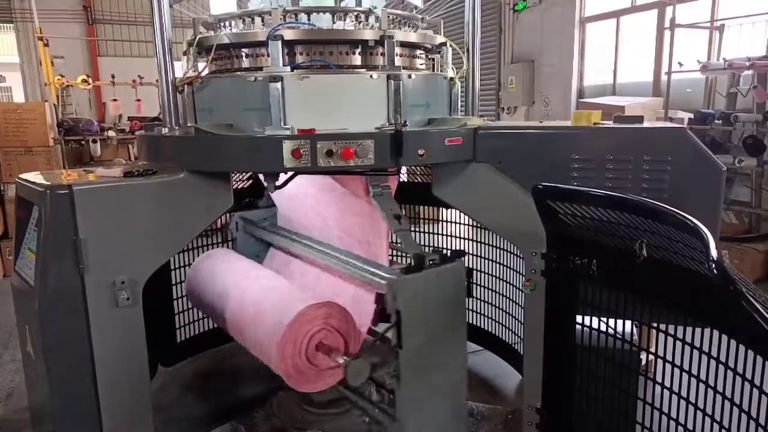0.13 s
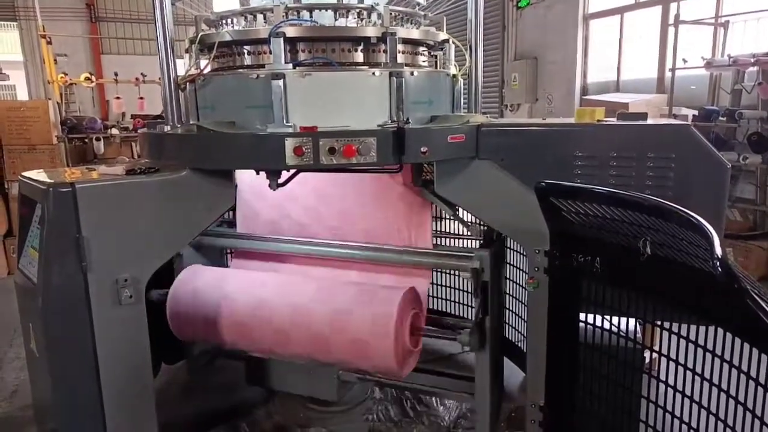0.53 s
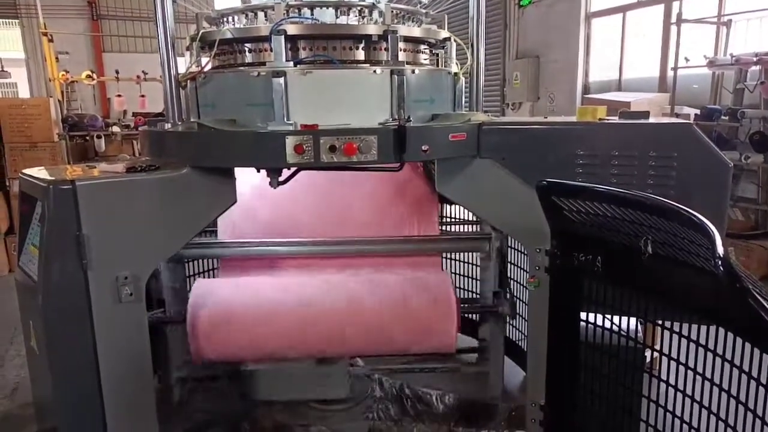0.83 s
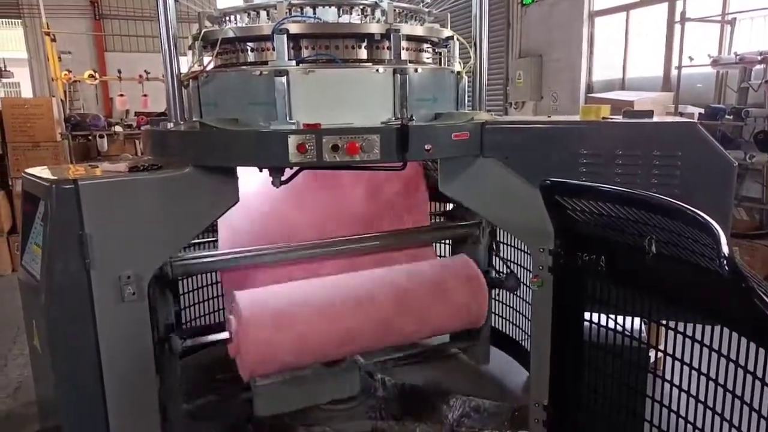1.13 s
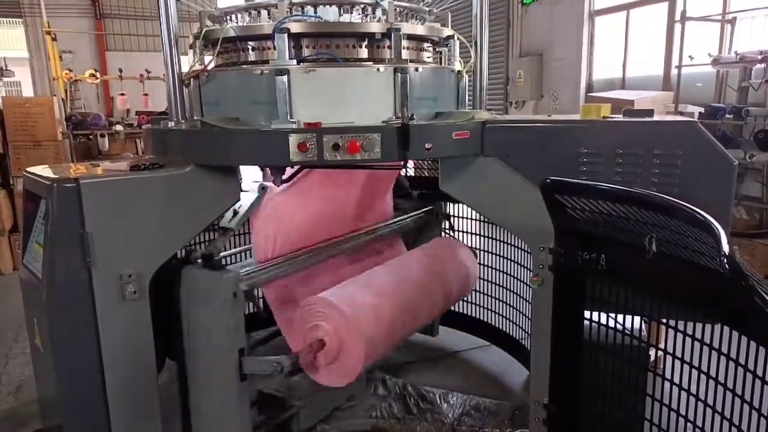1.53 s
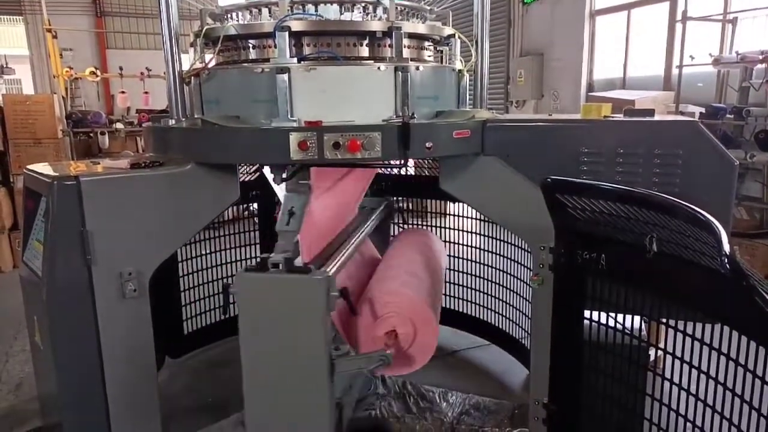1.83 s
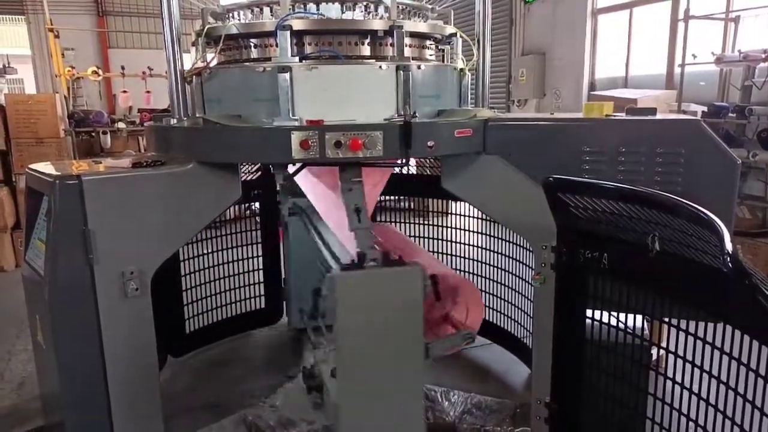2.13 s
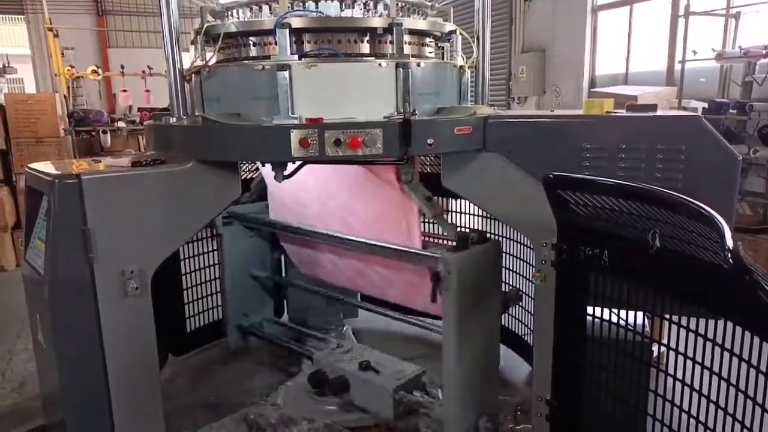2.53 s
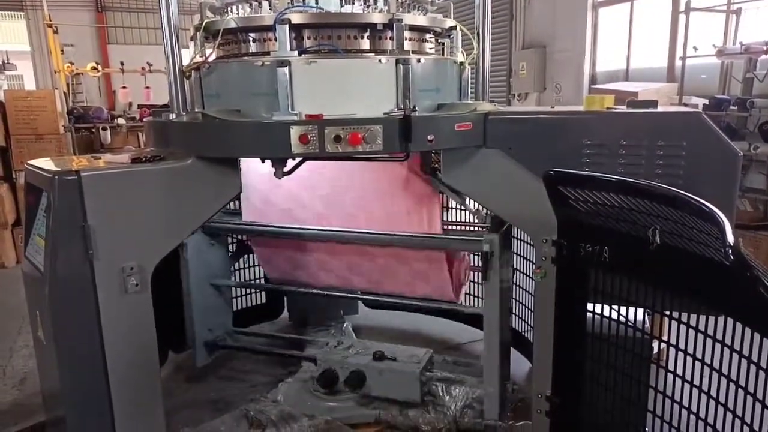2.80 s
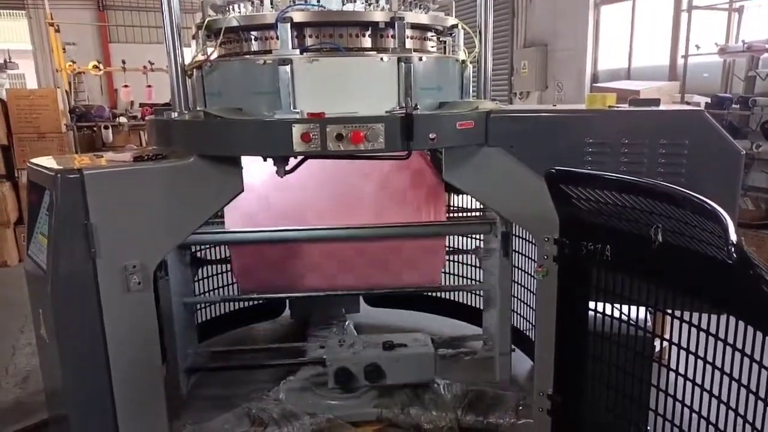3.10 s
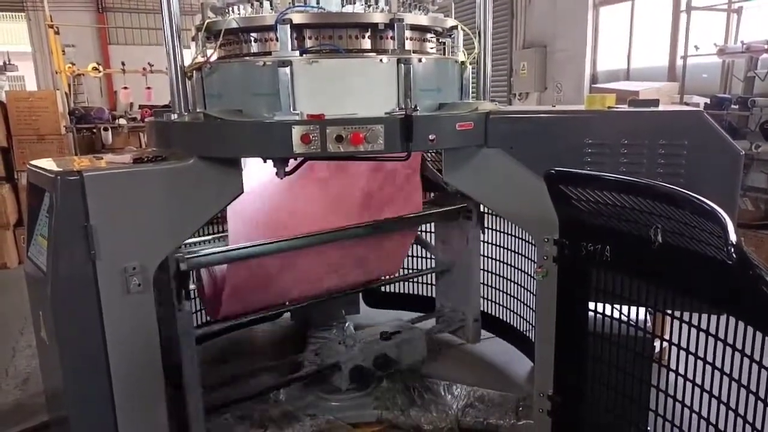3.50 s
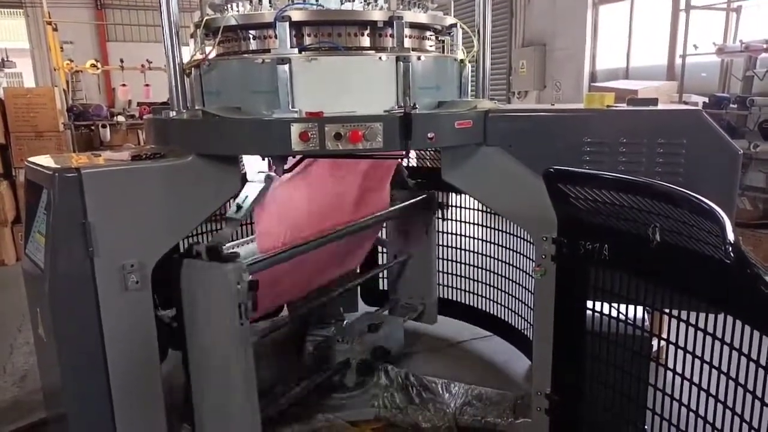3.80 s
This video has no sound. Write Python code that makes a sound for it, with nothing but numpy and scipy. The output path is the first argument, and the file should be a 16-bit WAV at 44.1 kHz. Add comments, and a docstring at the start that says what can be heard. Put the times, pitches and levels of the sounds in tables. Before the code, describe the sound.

A large knitting machine whirrs steadily in a factory hall, heard from just in front. Its needles blur into a dense rattle over a throbbing motor hum, while a whine repeatedly sags and jumps in pitch and soft low booms recur.

```python
"""A circular knitting machine runs steadily in a factory hall. From the start, hundreds of needles
rattle through their cams and blur into a whirr, over the throbbing hum of motor and gears and under
a thin hiss. Throughout, a turning part sings near 1 kHz, its overtones swelling in turn. At 0.5 s comes
a low boom; soon after, the sagging pitch of the whine jumps up, as it does four more times. From 1.8 s
the booms come more often, and near 3.6 s the last jump breaks into a rasp as a drone swells briefly."""
import sys
import numpy as np
from scipy import signal
from scipy.fft import rfft, irfft
from scipy.io import wavfile

SR = 44100
rng = np.random.default_rng(int(sys.argv[2]) if len(sys.argv) > 2 else 0)


def pcm_store(signal):
    """Save signal as 16-bit PCM."""
    levels = np.round(np.clip(np.atleast_2d(signal), -1, 1) * 32767)
    wavfile.write(sys.argv[1], SR, levels.astype(np.int16).T)


N = 174195
TIME = np.arange(N) / SR


def from_db(db):
    """Amplitude ratio: a factor of ten for every 20 dB."""
    return 10 ** (np.asarray(db) / 20)


def unit_rms(x):
    """Normalisation to a mean power of one."""
    return x / np.sqrt(np.mean(x ** 2) + 1e-20)


def in_time(rows):
    """Linear interpolation of (time_s, value) rows at every sample."""
    return np.interp(TIME, *np.transpose(rows))


def gaussian(centre_s, half_s):
    """A Gaussian envelope of height 1, down to 1/e at half_s from its centre."""
    return np.exp(-((TIME - centre_s) / half_s) ** 2)


def drift(rate_hz):
    """Random fluctuation of unit power: noise through a two-pole low-pass at rate_hz."""
    step, settle = 40, 2000   # samples per slow step; steps for the filter to settle
    pole = np.exp(-2 * np.pi * rate_hz * step / SR)
    noise = rng.standard_normal(N // step + settle + 2)
    slow = signal.lfilter([1], [1, -2 * pole, pole * pole], noise)[settle:]
    return np.interp(np.arange(N) / step, np.arange(len(slow)), unit_rms(slow))


def scatter(rate_hz):
    """A random phasor of unit power: amplitude and phase both fluctuate."""
    return (drift(rate_hz) + 1j * drift(rate_hz)) / np.sqrt(2)


def wavering_tone(pitch_hz, waver, rate_hz, clock=TIME):
    """Narrow-band modulation: a steady phasor plus a random one, at unit power."""
    phasor = 1 + waver * np.sqrt(2) * scatter(rate_hz)
    carrier = np.exp(2j * np.pi * (pitch_hz * clock + rng.random()))
    return unit_rms(np.real(phasor * carrier))


def coloured(white, spectrum):
    """Source and filter: white excitation takes on a spectral density, silent above its last row."""
    hz, db = np.transpose(spectrum)
    bins_hz = np.maximum(np.arange(N // 2 + 1) * SR / N, 1)
    gain = from_db(np.interp(np.log(bins_hz), np.log(hz), db, right=-np.inf))
    return irfft(rfft(white) * gain, N) * np.sqrt(SR / 2)


# Spectrum of the needle whirr, broad, strongest in the low mids, with little above 8.5 kHz:
# frequency_hz, relative_density_db
WHIRR_SPECTRUM = [(25, -86), (50, -80), (70, -73.5), (100, -68.5), (140, -59), (200, -58), (280, -57),
                  (400, -59), (560, -58), (750, -58.5), (860, -62.5), (1000, -64), (1150, -65.5),
                  (1400, -67), (1700, -66.5), (2250, -64.5), (2800, -63.5), (3400, -65.5), (4100, -62),
                  (4600, -64), (4900, -70.5), (5300, -73), (6000, -69), (6600, -69), (7500, -72),
                  (7900, -76), (8450, -75.5), (8800, -102), (10300, -92.5), (11000, -112)]

def needle_whirr(ticks_per_s=2500, tick_spread_db=2, tick_power_share=0.31):
    """Shot noise: dense needle impacts merge with sliding friction into a broad whirr."""
    strengths = from_db(tick_spread_db * np.minimum(rng.exponential(1, N), 4))
    signs = rng.choice([-1, 1], N)
    struck = rng.random(N) < ticks_per_s / SR
    ticks = unit_rms(strengths * signs * struck)
    sliding = rng.standard_normal(N)
    contact = np.sqrt(tick_power_share) * ticks + np.sqrt(1 - tick_power_share) * sliding
    level_db = -1 + 0.5 * drift(rate_hz=16)
    return from_db(level_db) * coloured(contact, WHIRR_SPECTRUM)


# Envelope of each harmonic of the whine, keyed by its number: time_s, relative_level_db
HARMONIC_LEVELS = { 1: [(0, -38.5), (.34, -36), (.44, -35.5), (.64, -24.5), (.73, -45), (.94, -32),
                   (1.16, -55), (1.42, -33.5), (1.53, -37.5), (1.74, -39.5), (1.82, -24.5), (1.9, -32),
                   (1.955, -26.5), (2.0, -38), (2.28, -46.5), (2.49, -29), (2.59, -38.5), (2.71, -34),
                   (2.78, -46), (3.38, -34.5), (3.52, -39.5), (3.94, -32.5)], 2: [(0, -50), (.06, -25.5),
                   (.11, -36.5), (.6, -38), (.8, -30), (1.11, -26.5), (1.2, -29), (1.5, -26.5), (1.88, -41),
                   (2.01, -27.5), (2.15, -28.5), (2.35, -24), (2.44, -29.5), (2.55, -32.5), (2.69, -31),
                   (2.8, -32.5), (2.93, -42), (3.18, -34.5), (3.4, -42), (3.54, -35), (3.62, -27.5),
                   (3.7, -37), (3.94, -33)], 3: [(0, -33), (.06, -36), (.15, -36), (.31, -32), (.44, -57),
                   (.56, -32.5), (.68, -42), (1, -44), (1.1, -36.5), (1.25, -32.5), (1.35, -37), (1.8, -37),
                   (1.88, -40), (2.2, -34), (2.29, -40), (2.55, -35), (2.65, -43), (2.83, -50), (2.94, -36),
                   (3.03, -38), (3.16, -33), (3.22, -42), (3.7, -41), (3.94, -38)], 4: [(0, -35),
                   (.25, -36.5), (.48, -31.5), (.77, -38.5), (.89, -35), (1.03, -38), (1.21, -43),
                   (1.38, -34), (1.74, -38), (1.86, -25), (1.92, -39), (1.98, -27), (2.04, -30),
                   (2.16, -27), (2.22, -30), (2.27, -19.5), (2.32, -27), (2.36, -23.5), (2.44, -28),
                   (2.5, -26), (2.6, -31), (2.66, -33), (2.78, -36), (3.43, -43), (3.94, -36.5)],
                   6: [(0, -43), (.23, -51), (.6, -45), (.98, -45), (1.4, -49), (1.79, -48), (2.31, -49),
                   (2.68, -37), (2.83, -51), (3.94, -53)], 7: [(0.0, -46), (0.62, -38.5), (0.69, -47),
                   (1.15, -62), (1.24, -37), (1.32, -56), (1.75, -37), (2.3, -48), (2.35, -29.5),
                   (2.48, -44), (2.53, -26), (2.6, -44), (2.99, -41.5), (3.61, -49), (3.72, -44),
                   (3.94, -55)], }
# Noisy share of the fundamental's power, greatest at pitch jumps: time_s, roughness_fraction
ROUGHNESS = [(0, 0.07), (.3, 0.22), (.5, 0), (.66, .15), (.76, 0.33), (.85, 0.37), (.95, 0.06), (1.25, 0),
             (1.33, 0.09), (1.6, 0.11), (1.85, 0.04), (1.97, 0.17), (2.05, 0.46), (2.14, 0.09),
             (2.25, 0.01), (2.55, 0.02), (2.66, 0.02), (2.9, 0.24), (3.15, .08), (3.45, 0.02), (3.56, 0.82),
             (3.64, .65), (3.73, 0), (3.95, 0)]

def whine_harmonics(pitch_hz, rasp_width_hz=20, flutter_db=0.98):
    """A harmonic series: roughness moves power from each line into a noise band, higher ones first."""
    phase = 2 * np.pi * np.cumsum(pitch_hz) / SR
    smoothness = np.clip(1 - in_time(ROUGHNESS), 0, 1)
    out = 0
    for number, levels in HARMONIC_LEVELS.items():
        tonal_share = smoothness ** number
        phasor = np.sqrt(tonal_share) + np.sqrt(1 - tonal_share) * scatter(rasp_width_hz * number)
        gain = from_db(in_time(levels) + flutter_db * drift(rate_hz=22))
        out += np.sqrt(2) * gain * np.real(phasor * np.exp(1j * number * phase))
    return out


def hall(x, t60_s=0.51, delay_s=0.016):
    """Diffuse reverberation: convolution with exponentially decaying noise of unit energy."""
    t = TIME[:SR]
    tail = rng.standard_normal(SR) * 1e-3 ** (t / t60_s) * (t > delay_s)
    return signal.fftconvolve(x, tail / np.sqrt(np.sum(tail ** 2)))[:N]


# Fundamental of the singing part, jumping and sagging: time_s, pitch_hz
WHINE_FUNDAMENTAL = [(0.0, 995), (0.11, 988), (0.31, 937.5), (0.51, 921), (0.645, 908.5), (0.7, 995),
                     (0.76, 1070), (0.88, 1002.0), (1.01, 985), (1.27, 979.5), (1.31, 1017), (1.48, 991),
                     (1.7, 931), (1.84, 912), (1.95, 913), (2.04, 1046), (2.12, 984), (2.2, 966.4),
                     (2.57, 955), (2.63, 1002), (2.69, 1004), (2.9, 928), (2.98, 915), (3.14, 934),
                     (3.3, 909.6), (3.45, 908), (3.54, 1021), (3.63, 953), (3.76, 941), (3.95, 942)]

def whine(held_jitter_hz=1.0, glide_jitter_s=0.00388, smear_hz=2.53):
    """Frequency modulation: a turning part jitters as it glides; the turning frame smears its echoes."""
    pitch_hz = in_time(WHINE_FUNDAMENTAL)
    glide_hz_per_s = np.abs(np.gradient(pitch_hz)) * SR
    jitter_hz = held_jitter_hz + glide_jitter_s * glide_hz_per_s
    pitch_hz += jitter_hz * drift(rate_hz=68.5)
    echoes = hall(whine_harmonics(pitch_hz + smear_hz * drift(rate_hz=16.9)))
    direct = whine_harmonics(pitch_hz)
    return from_db(-1) * direct + from_db(-9) * echoes


# Drive tones that swell and fade:
# pitch_hz, throb_fraction, waver_ratio, waver_rate_hz, envelope rows of (time_s, relative_level_db)
DRIVE_TONES = [ (155.7, 0.07, 0.23, 6.4, [(0, -39), (.2, -45), (.32, -33.5), (1.15, -54), (1.55, -46),
               (1.8, -37.5), (2.5, -43.5), (3.95, -51)]), (203.6, 0.99, 0.12, 3.6, [(0, -41), (.22, -30.5),
               (.43, -36), (.65, -31), (.78, -41.5), (.95, -48), (1.06, -36), (1.27, -30.5), (1.47, -38),
               (1.68, -32), (1.82, -36.5), (1.92, -32), (2.1, -34.5), (2.58, -36.5), (2.7, -41),
               (3.03, -38), (3.15, -33.5), (3.8, -35), (3.95, -37)]), (612, 0.36, 0.32, 15, [(0, -42),
               (.07, -33), (.2, -33), (.42, -41), (.6, -34), (.98, -40), (1.17, -29.5), (1.46, -50),
               (1.55, -37), (1.7, -32), (1.77, -52), (1.95, -51), (2.18, -33), (2.38, -45), (2.55, -36.5),
               (2.97, -46), (3.05, -32.5), (3.18, -31.5), (3.39, -42), (3.6, -36), (3.95, -41.5)]), ]
# Uneven dips in level that the drive tones share: centre_s, depth_fraction
THROB_DIPS = [(.09, 0.9), (.31, 0.63), (.51, 0.6), (.86, 0.5), (1.18, .7), (1.38, 0.5), (1.55, 0.81),
              (1.99, 0.74), (2.26, 0.95), (2.46, .6), (2.83, 0.8), (3.48, 0.96)]

def drive_drones(dip_half_s=0.049, speed_wander=0.0073):
    """Amplitude and frequency modulation: tones of one drive throb together and follow its speed."""
    dips = sum(depth * gaussian(centre_s, dip_half_s) for centre_s, depth in THROB_DIPS)
    clock = np.cumsum(1 + speed_wander * drift(rate_hz=10.3)) / SR
    out = 0
    for pitch_hz, throb, waver, rate_hz, levels in DRIVE_TONES:
        envelope = from_db(in_time(levels)) * np.clip(1 - throb * dips, 0, 1)
        out += envelope * wavering_tone(pitch_hz, waver, rate_hz, clock)
    return out


# Faint steady tones of motor and gears: pitch_hz, level_db
HUM_LINES = [(80.7, -55), (105, -57), (134.6, -55), (293.4, -46), (403, -45), (449.5, -47), (476.4, -54),
             (500.6, -49.5), (553.1, -52), (804.8, -51.5), (1075.3, -49.5), (1098.2, -50), (1441.4, -59),
             (1609.6, -49), (2012, -46.5)]

def motor_and_gears():
    """Periodic forces give a line spectrum: a faint hum, a firm gear tone and a fluttering one."""
    hum = sum(from_db(db) * wavering_tone(hz, waver=0.32, rate_hz=2.3) for hz, db in HUM_LINES)
    firm_gear = from_db(-38) * wavering_tone(pitch_hz=426.5, waver=0.098, rate_hz=2.4)
    fluttering_gear = from_db(-43.5) * wavering_tone(pitch_hz=1210.5, waver=0.41, rate_hz=12)
    return hum + firm_gear + fluttering_gear


# Brief swelling tones, low booms near 300 Hz and a late swell of the drone near 625 Hz:
# centre_s, pitch_hz, half_length_s, peak_db
SWELLS = [(0.501, 307, 0.066, -32), (1.853, 307, 0.067, -34), (2.381, 322.5, .07, -36),
          (2.94, 297.4, .07, -35.5), (3.149, 307.6, .09, -38), (3.35, 299, .07, -36.5),
          (3.63, 625.3, .065, -30)]

def swelling_tones():
    """Tone bursts: each rises and dies away at one frequency under a Gaussian envelope."""
    out = 0
    for centre_s, pitch_hz, half_s, peak_db in SWELLS:
        envelope = from_db(peak_db) * gaussian(centre_s, half_s)
        out += envelope * wavering_tone(pitch_hz, waver=0.1, rate_hz=14)
    return out


# Spectrum of the thin hiss: frequency_hz, density_db
HISS_SPECTRUM = [(11450, -115), (11620, -67), (12040, -67), (12200, -125)]

def high_hiss(flicker_db=0.1):
    """Band-limited noise near 12 kHz, its level flickering very slightly."""
    gain = from_db(-flicker_db * drift(rate_hz=25))
    return gain * coloured(rng.standard_normal(N), HISS_SPECTRUM)


def scene():
    """Superposition: the sources of the machine add in one channel, heard from just in front."""
    mix = needle_whirr() + whine() + drive_drones() + motor_and_gears() + swelling_tones() + high_hiss()
    return mix[None]


def record(dry, cutoff_hz=12425):
    """Band limiting: an elliptic low-pass cuts the top steeply."""
    return signal.sosfilt(signal.ellip(10, .1, 80, cutoff_hz, fs=SR, output="sos"), dry)


dry = scene()
out = record(dry)
pcm_store(out)
```